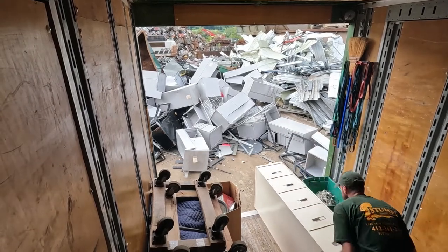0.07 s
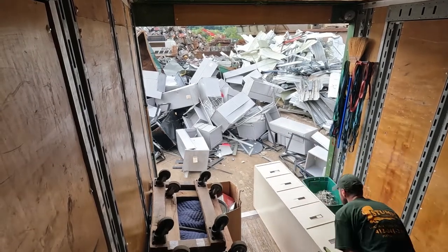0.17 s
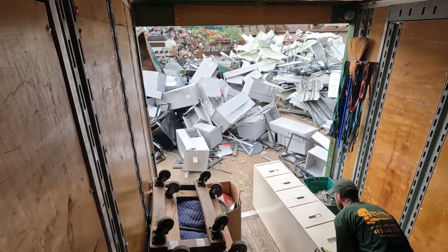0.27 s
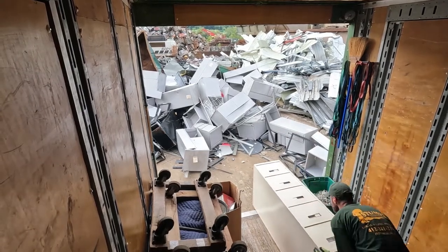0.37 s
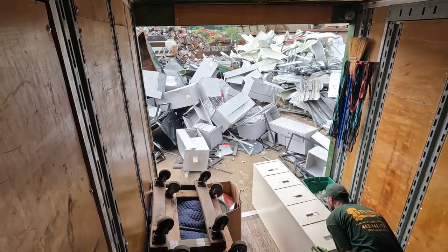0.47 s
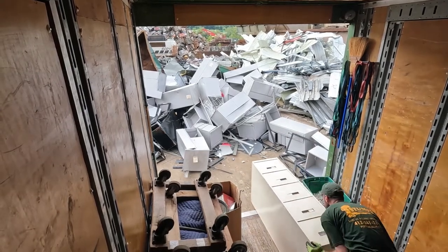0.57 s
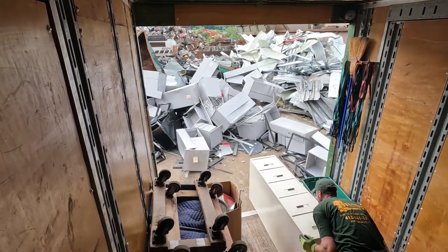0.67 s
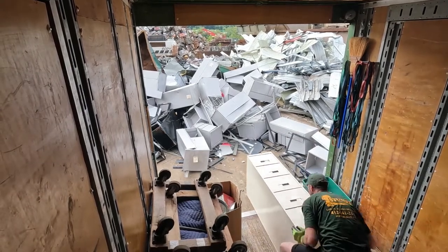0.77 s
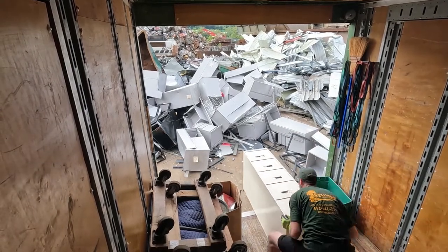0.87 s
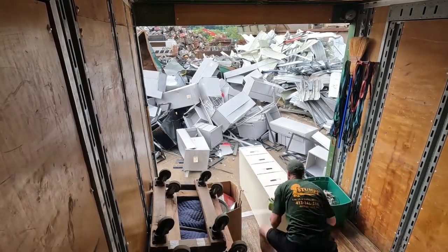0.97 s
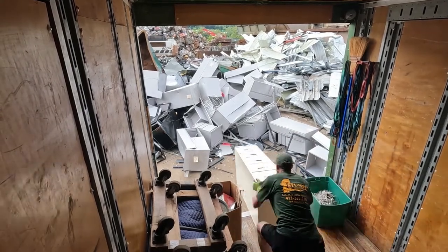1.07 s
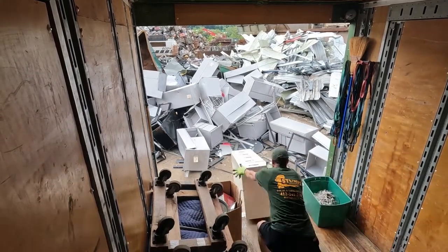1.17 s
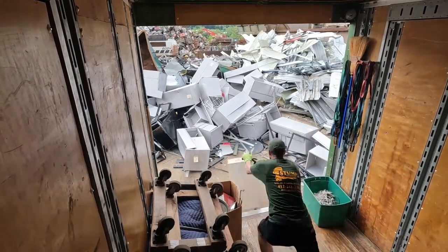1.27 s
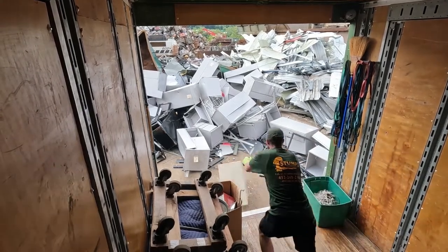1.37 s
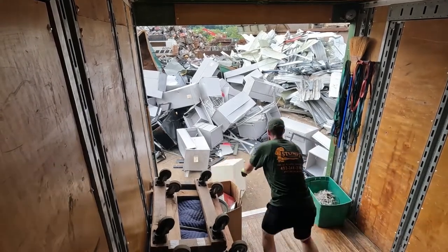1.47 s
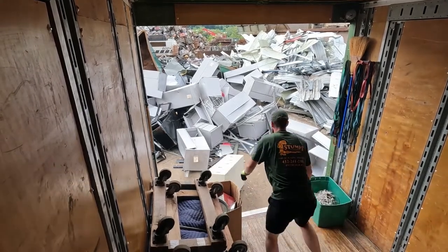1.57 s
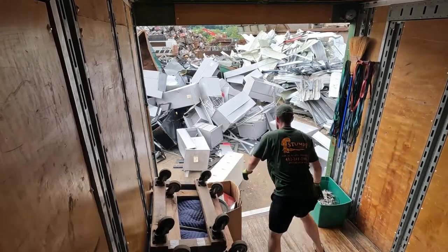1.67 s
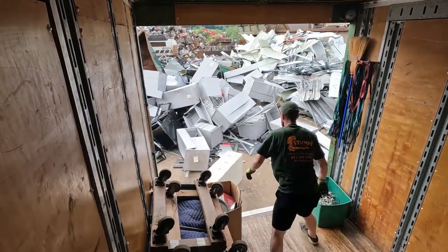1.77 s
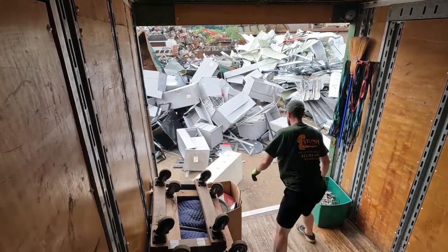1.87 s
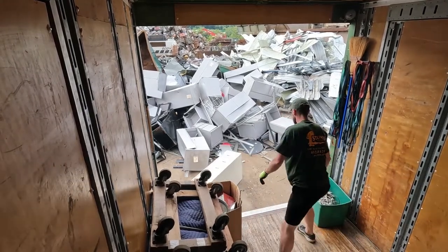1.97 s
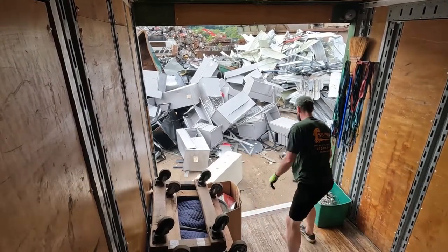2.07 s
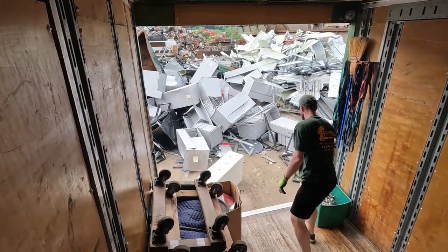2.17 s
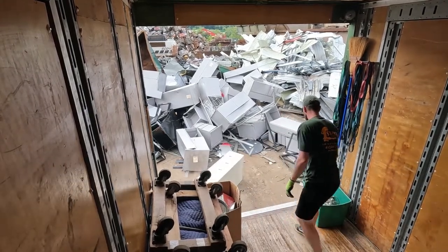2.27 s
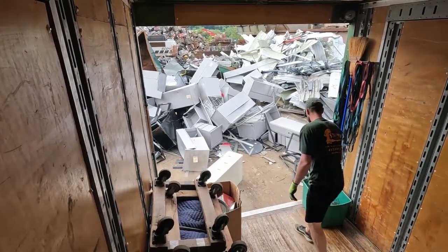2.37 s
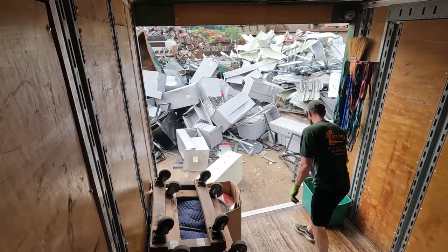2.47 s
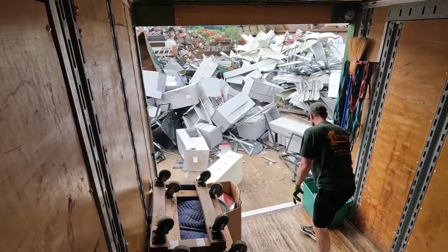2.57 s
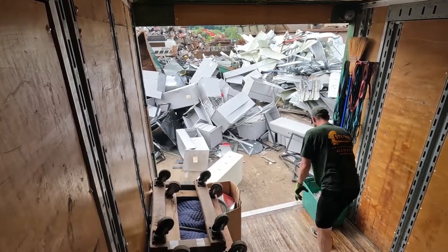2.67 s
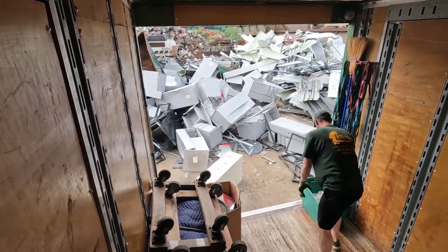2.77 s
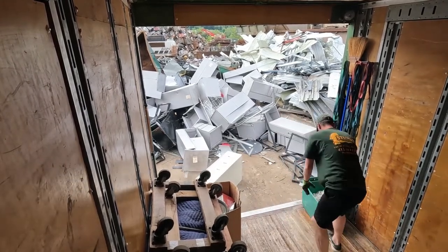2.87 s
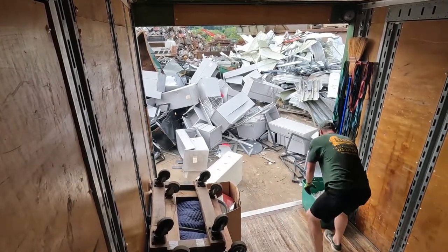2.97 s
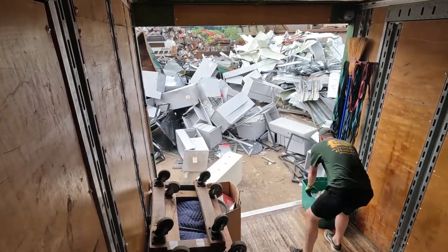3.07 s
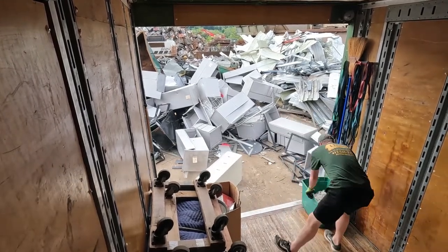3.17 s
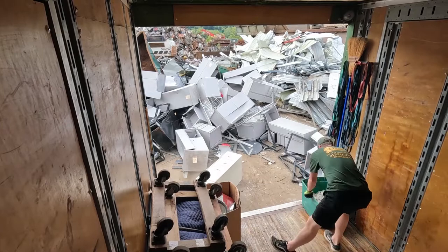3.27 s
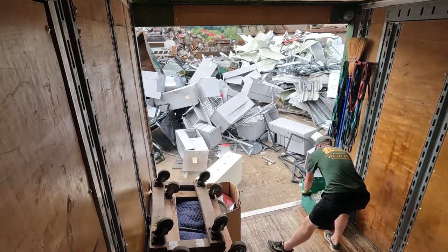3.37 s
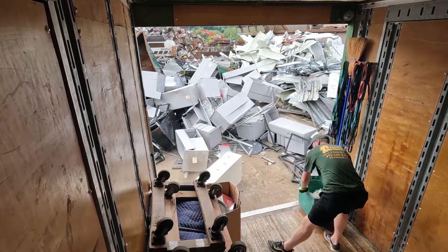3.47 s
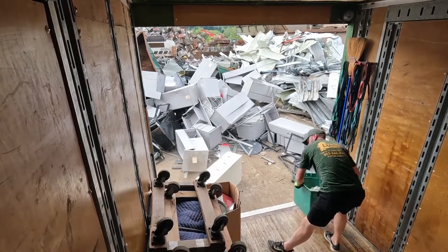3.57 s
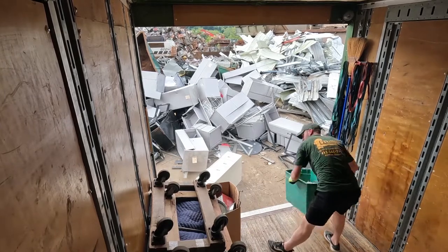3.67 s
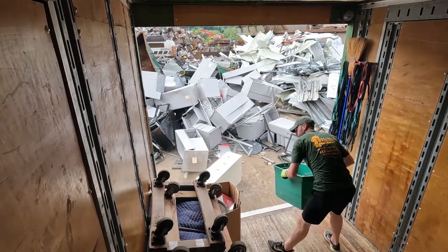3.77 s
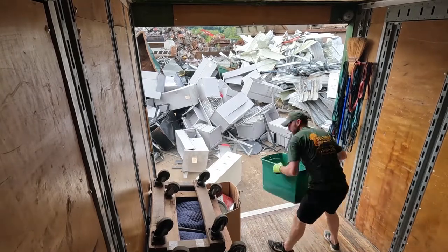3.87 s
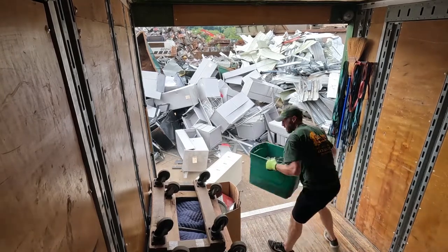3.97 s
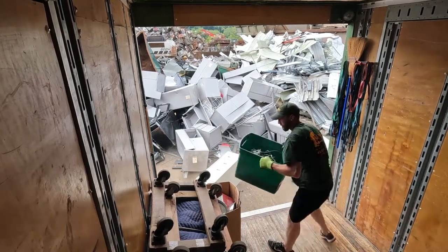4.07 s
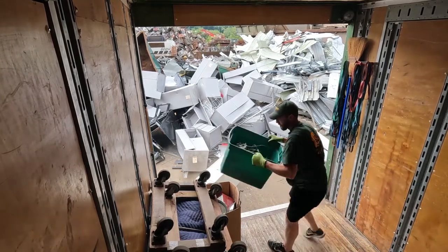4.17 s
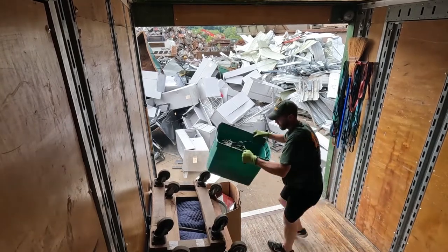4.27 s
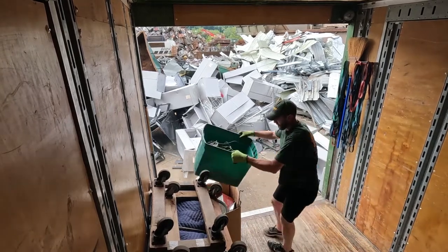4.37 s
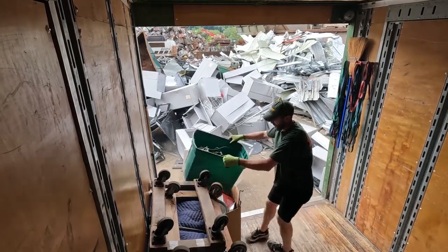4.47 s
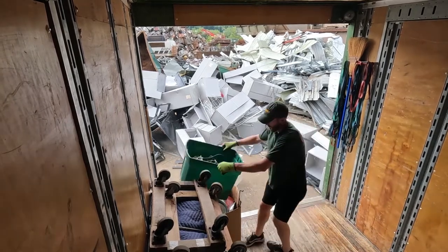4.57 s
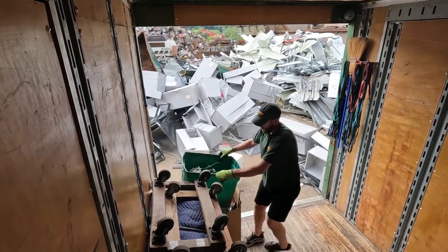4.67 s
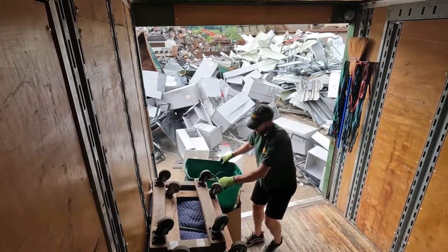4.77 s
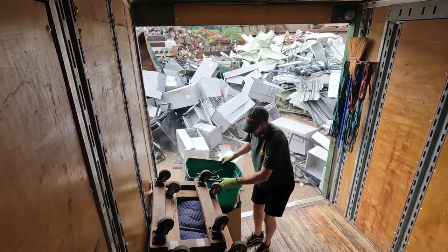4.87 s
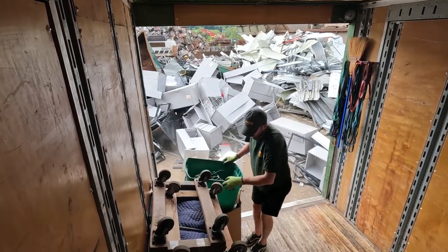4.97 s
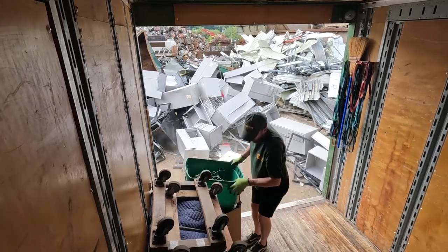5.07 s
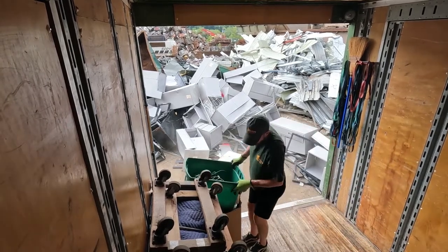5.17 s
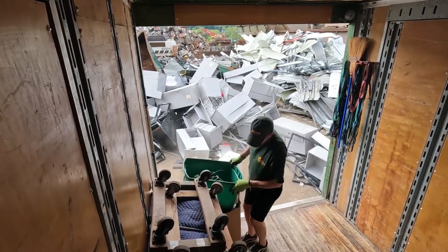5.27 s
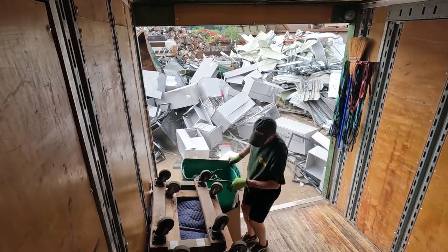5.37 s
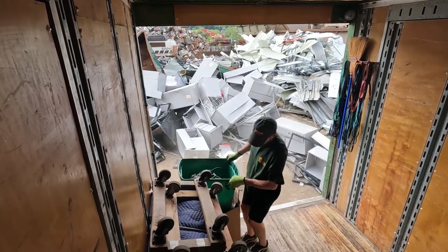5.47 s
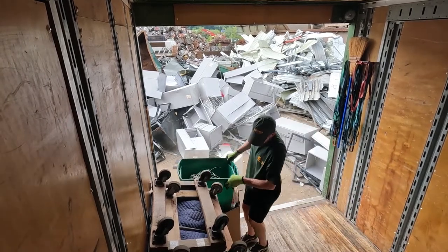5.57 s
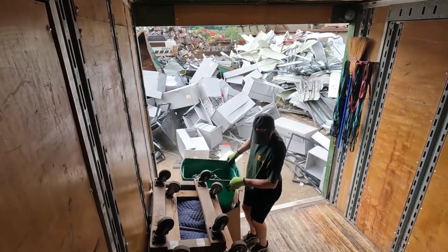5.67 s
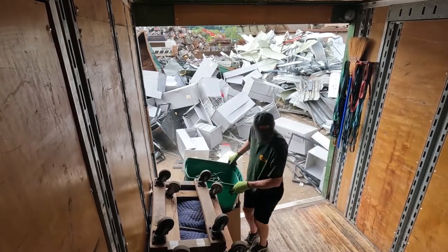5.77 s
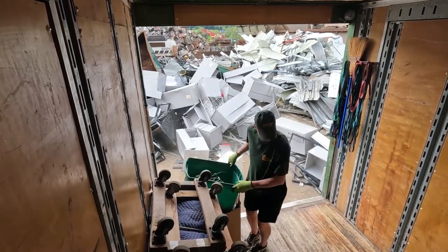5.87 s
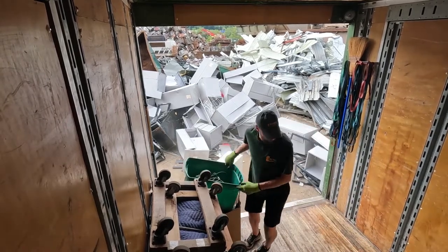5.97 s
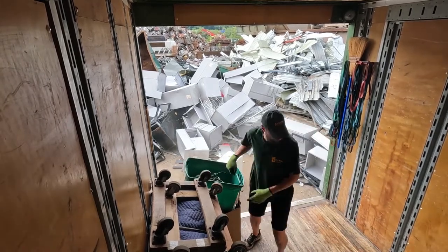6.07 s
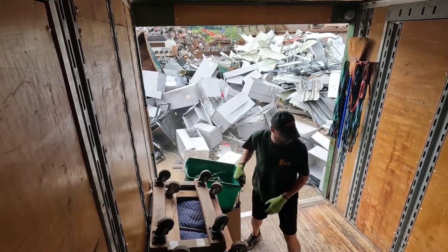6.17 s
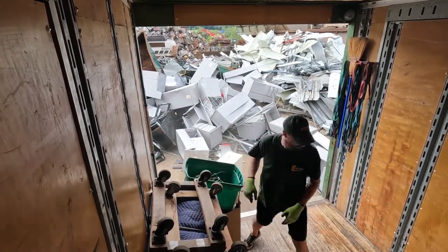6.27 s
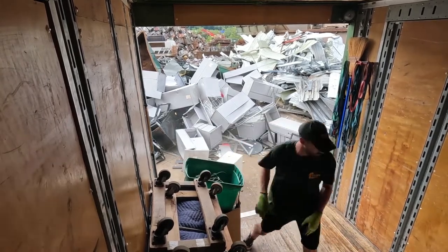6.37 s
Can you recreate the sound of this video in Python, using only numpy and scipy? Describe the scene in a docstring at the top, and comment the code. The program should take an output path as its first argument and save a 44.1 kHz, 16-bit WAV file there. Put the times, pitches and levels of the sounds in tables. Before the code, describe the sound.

From 0 s a heavy steel cabinet scrapes briefly over a wooden truck floor, its panels drumming, then eases to a low hum by 0.2 s. From about 0.6 s the push builds; around 1.05 to 1.3 s come short squeals, a rasping groan and the hardest scraping. At 1.48 s it crashes loudly, booming, with drawers rattling and small clanks; a second sharp, clanging crash hits at 1.83 s, and lesser rattles settle near 2.3 s. Dull boot thuds and gritty scuffs run from 2.5 to 3.7 s. Loose scrap rustles softly as a plastic bin is handled until about 5 s. It lands at 4.84 s with a bright clack, hollow boom and jumping scrap. Faint taps follow at 5.3 s, another firm knock at 5.85 s, then gentle rustling to the end. Distant machinery rumbles throughout under faint open-air hiss; the close stereo sound has a short boxy echo.

```python
"""A steel filing cabinet is shoved along the plywood floor of a truck box and crashes twice in a scrap yard.
Stick-slip contacts drive its panels and steel as it slides; blows ring its modes and rattle its drawers.
Boots thud and scuff on the boards; a plastic bin of loose scrap is lifted, rustling, and knocked down on a load,
its rim and hollow walls ringing as modes. Scattered taps give the box a short hollow echo, and filtered noise
makes distant machinery rumble in the yard."""
import sys
import numpy as np
from scipy import signal
from scipy.fft import rfft, irfft, next_fast_len
from scipy.io import wavfile

SR = 44100
rng = np.random.default_rng(int(sys.argv[2]) if len(sys.argv) > 2 else 0)


def output_pcm(signal):
    """Save a mono or channel-first signal as 16-bit PCM at the path in sys.argv[1].

    Samples are clipped to [-1, 1] before scaling.
    """
    pcm = np.clip(np.atleast_2d(signal).T, -1, 1) * 32767
    wavfile.write(sys.argv[1], SR, np.round(pcm).astype(np.int16))


N = 283959
T = np.arange(N) / SR  # seconds
HZ = np.fft.rfftfreq(16384, 1 / SR)  # frequency grid of the filters


def amp(db):
    """Level: decibels become a gain in amplitude."""
    return 10 ** (np.asarray(db) / 20)


def unit(x):
    """Normalisation: the signal is scaled to rms 1."""
    return x / np.sqrt(np.mean(x ** 2) + 1e-20)


def read(points, hz=HZ):
    """Spectral envelope: a table is interpolated on a log-frequency axis."""
    f, value = np.transpose(points)
    return np.interp(np.log(hz + 1), np.log(f + 1), value)


def shape(spectrum):
    """Spectral envelope: gain of a broad spectrum, with mean power 1."""
    return unit(amp(read(spectrum)))


def curves(rows):
    """Temporal envelope: each column of a table becomes a curve in time."""
    s, *columns = np.transpose(rows)
    return [np.interp(T, s, c) for c in columns]


def add(mix, s, sound):
    """Superposition: a sound is added to the mix at time s."""
    part = mix[max(round(s * SR), 0):][:len(sound)]
    part += sound[:len(part)]


def swell(out, s, seconds, db, sound):
    """Temporal envelope: a stretch of sound rises and falls as half a sine."""
    part = sound[:round(seconds * SR)]
    arch = np.sin(np.pi * np.arange(len(part)) / len(part))
    add(out, s, amp(db) * part * arch)


def colour(x, gain):
    """Minimum-phase filtering: a causal filter has the given gain at each frequency."""
    mirrored = np.r_[gain, gain[-2:0:-1]]
    log_gain = np.log(np.maximum(mirrored, 1e-5))
    # the Hilbert transform of the log gain gives the phase
    taps = np.fft.ifft(np.exp(np.conj(signal.hilbert(log_gain)))).real
    return signal.oaconvolve(x, taps[:len(gain)])[:len(x)]


def peaks(rows):
    """Resonance: the powers of a set of peaks add up; each width is where a peak halves in amplitude."""
    power = sum(amp(db) ** 2 / (1 + ((HZ - hz) / width) ** 2) ** 2 for hz, width, db in rows)
    return np.sqrt(power)


def decay(t, t60):
    """Exponential decay: the level falls 60 dB in t60 seconds."""
    return np.exp(-np.log(1000) * t / t60)


def wander(rate):
    """Random modulation: slow motion of rms 1 through `rate` random values per second."""
    knots = rng.standard_normal(4096)
    return unit(np.interp(T * rate, np.arange(len(knots)), knots))


def waver(hz, jitter, jitter_per_s):
    """Frequency modulation: a vibration's pitch wavers round the given one."""
    return np.sin(2 * np.pi * np.cumsum(hz * (1 + jitter * wander(jitter_per_s))) / SR)


def grains(per_s, spread_db):
    """Impulsive excitation: tiny contacts at random moments, a few larger than the rest."""
    size = amp(spread_db * np.minimum(rng.exponential(1, N), 4)) * rng.choice([-1, 1], N)
    return unit(size * (rng.random(N) < per_s / SR))


CRACK_S = 0.00084  # a blow with this attack gives the full crack; a slower attack gives less


def clatter(rows, body, per_s, spread_db, crack_db, treble_hz):
    """Impact noise: a shower of contacts builds up and dies; the quicker it builds, the louder it cracks."""
    out, t, shower = np.zeros(N), T[:SR], grains(per_s, spread_db)
    for s, db, treble_db, t60, attack_s in rows:
        contacts = np.roll(shower, -round(s * SR))[:SR]  # its own stretch of the shower
        force = contacts * decay(t, t60) * (1 - np.exp(-t / attack_s))
        force[:3] += amp(crack_db) * CRACK_S / attack_s * np.array([.5, 1, .5]) / 2
        dull = signal.lfilter(*signal.butter(1, treble_hz, fs=SR), force)
        add(out, s, amp(db) * (dull + amp(treble_db) * (force - dull)))
    return colour(out, body)


def ring(hz, t60, rise):
    """Modal radiation: one mode swells briefly and dies away; the air follows the surface's speed."""
    t = T[:SR]
    motion = np.sin(2 * np.pi * hz * t) * decay(t, t60) * (1 - np.exp(-t / rise))
    return np.gradient(motion) * SR / (2 * np.pi * hz)


def booms(rows, modes, rise, scatter_db):
    """Modal synthesis: each blow, at the level in its last column, rings a slightly varied mix of modes."""
    out = np.zeros(N)
    # neighbouring modes have opposite signs
    rings = np.array([(-1) ** k * amp(db) * ring(hz, t60, rise) for k, (hz, db, t60) in enumerate(modes)])
    for row, mix in zip(rows, rng.standard_normal((len(rows), len(modes)))):
        add(out, row[0], amp(row[-1] + scatter_db * mix) @ rings)
    return out


def with_contents(blows, strike_t60, lag_s, landing_attack_s):
    """Secondary impact: the shell strikes, then its loose contents land and rattle."""
    rows = []
    for s, strike_db, rattle_db, rattle_t60, treble_db, attack_s, *_ in blows:
        rows.append((s, strike_db, treble_db, strike_t60, attack_s))
        rows.append((s + lag_s, rattle_db, treble_db, rattle_t60, landing_attack_s))
    return rows


def follow(law, effort_db):
    """Power law: the gain of a voice grows with effort."""
    full_effort_db, slope = law
    return amp(full_effort_db + slope * effort_db)


# How hard the cabinet is pushed: one shove dies away, the next builds until it tips out.
# Each row: time in seconds, effort in dB.
PUSH = [(0, -6.5), (.17, -22.5), (.5, -32), (.62, -21), (.9, -14.5), (1.05, -13), (1.105, -2.5), (1.2, 0),
        (1.35, -10), (1.46, -22.5)]
# Laws of the sliding voices. Each: level at full effort in dB, dB gained per dB of effort.
DRUM_LAW = (-11, 0.92)
DRONE_LAW = (-16.5, 0.13)
SCRAPE_LAW = (-25, 1)
GRIT_LAW = (-38.5, 0.87)
# Panels drumming on the floor. Each row: frequency in Hz, half-width in Hz, relative level in dB.
PANEL_RESONANCES = [(59.5, 25, 4), (83, 20, -1.5), (121.7, 9.1, 4.5), (167, 44, -8), (224, 43, -11),
                    (260.2, 15, -9), (328, 66, -27.5)]
# Spectrum of scraping steel. Each row: frequency in Hz, relative level in dB.
SCRAPE_SPECTRUM = [(210, -31), (350, 5), (500, -1.5), (660, -3.5), (763, -5.5), (1150, -3), (2560, -16.5),
                   (3170, -15), (5000, -39), (6500, -67), (11000, -120)]
# Spectrum of crunching grit. Each row: frequency in Hz, relative level in dB.
GRIT_SPECTRUM = [(2350, -4), (4000, -4), (4370, -4), (7090, -7), (8450, -17), (12000, -19.5), (13700, -30)]
PANEL_RELEASE_DB_PER_S = 43  # the panels ring on when the push eases
DRONE_REST_HZ, DRONE_RISE_HZ = 91.1, 26.76  # the largest panel hums higher under load


def slide():
    """Stick-slip friction: panels drum and hum, steel scrapes, groans and squeals, grit crunches."""
    effort_db, = curves(PUSH)
    release = PANEL_RELEASE_DB_PER_S * T
    shake_db = np.maximum.accumulate(effort_db + release) - release
    judder = unit(amp(2.07 * wander(70.16)))
    on_floor = np.interp(T, [1.45, 1.49], [1, 0])
    # a thin panel radiates little below its lowest mode
    panels = peaks(PANEL_RESONANCES) * HZ ** 3 / (HZ ** 3 + 65 ** 3)
    drum = follow(DRUM_LAW, shake_db) * unit(colour(grains(900, 2.2) * judder, panels))
    drone_hz = DRONE_REST_HZ + DRONE_RISE_HZ * amp(shake_db)
    drone = follow(DRONE_LAW, shake_db) * waver(drone_hz, jitter=0.011, jitter_per_s=16.5)
    free = 1 - amp(effort_db - shake_db)  # the panel hums most as the push lets go
    scrape = follow(SCRAPE_LAW, effort_db) * colour(grains(3000, 3.0) * judder, shape(SCRAPE_SPECTRUM))
    grit = follow(GRIT_LAW, effort_db) * colour(grains(2500, 1.1) * judder, shape(GRIT_SPECTRUM))
    return on_floor * (drum + free * drone + scrape + grit + groan() + sliding_tones())


# Spectrum of the yard's noise. Each row: frequency in Hz, relative level in dB.
YARD_SPECTRUM = [(12, -2), (24, 2), (48, -7), (85, 0), (114, -7), (145, -7.5), (185, -9.5), (229, -10.5),
                 (400, -20.5), (500, -24), (1100, -24.5), (3400, -36.5), (7300, -46.5), (8800, -64),
                 (12300, -103), (14000, -107)]
# The drifting rumble. Each row: time in seconds, level in dB.
RUMBLE_DB = [(0, -47.5), (3.1, -30), (4.2, -35), (4.8, -31.5), (5.45, -45), (5.8, -36), (6.44, -35.5)]
# A distant engine: frequency in Hz, half-width in Hz, level in dB.
ENGINE_HUM = (142.4, 26.7, -38)
DEEP_DB, DEEP_HZ = -37.5, 53.6  # the deepest rumble stays steady
WASH_DB, WASH_DRIFT_DB = -49.5, 0.8  # hiss of the open yard: middle level, rms drift


def yard():
    """Filtered noise: a steady deep drone, a drifting rumble, a wavering hum and a nearly steady wash."""
    rumble_db, = curves(RUMBLE_DB)
    spectrum = amp(read(YARD_SPECTRUM))
    # power shares of the bands
    low = 1 / (1 + (HZ / 400) ** 4)
    lowest = 1 / (1 + (HZ / DEEP_HZ) ** 4)
    deep = unit(colour(rng.standard_normal(N), spectrum * np.sqrt(lowest)))
    rumble = unit(colour(rng.standard_normal(N), spectrum * np.sqrt(low * (1 - lowest))))
    wash = unit(colour(rng.standard_normal(N), spectrum * (1 - low)))
    hum = unit(colour(rng.standard_normal(N), peaks([ENGINE_HUM])))
    wash_gain = amp(WASH_DB + WASH_DRIFT_DB * wander(13))
    return amp(DEEP_DB) * deep + amp(rumble_db) * rumble + wash_gain * wash + amp(ENGINE_HUM[2]) * hum


# Short scuffs: grit crunching under the sliding cabinet, soles on the boards, scrap shifting.
# Each row: start in seconds, level in dB, treble in dB, t60 in seconds, attack in seconds.
SCUFFS = [(0, -42.5, 18, 0.13, 0.002), (.298, -53, 19, 0.072, 0.0046), (.868, -48.5, 7, 0.36, .005),
          (1.003, -28.5, -17, 0.25, 0.004), (1.088, -37, -5, 0.2, .006), (2.505, -46, 13.5, 0.15, 0.0031),
          (2.53, -35.5, -5, 0.44, 0.016), (2.703, -39, -2, 0.39, 0.002), (2.784, -40, 12, 0.2, 0.0015),
          (2.914, -51, 17, 0.26, 0.0019), (2.947, -41.5, -12, 0.39, 0.0035), (3.059, -42, -3, 0.48, 0.012),
          (3.285, -51, 5.5, 0.71, 0.0063), (3.365, -42.5, -10, 0.42, 0.012), (3.41, -37, -14, 0.38, 0.014),
          (4.65, -42.5, 14.5, 0.17, 0.0097), (4.73, -48.5, 11.5, 0.92, 0.0053),
          (4.827, -38, -10, 0.13, 0.006), (6.355, -50.5, 19, 0.25, .006)]
# Spectrum of a scuff. Each row: frequency in Hz, relative level in dB.
SCUFF_SPECTRUM = [(110, -9), (230, 7), (400, -1), (600, 3), (1050, 5.5), (2000, -5), (4000, -11),
                  (7000, -17), (8800, -27), (12000, -28), (15000, -51)]


def scuffs():
    """Frictional contact noise: grit crunches under the cabinet, soles scuff the boards and scrap shifts."""
    return clatter(SCUFFS, shape(SCUFF_SPECTRUM), per_s=1600, spread_db=2.0, crack_db=18, treble_hz=3520)


# Short tones of the sliding steel: squeals of the edge and the groan's clearer tones.
# Each row: start in seconds, length in seconds, middle pitch in Hz, glide in Hz per second, level in dB.
SLIDING_TONES = [(0.914, 0.11, 976, 250, -35), (0.998, 0.09, 996, -400, -38),
                 (1.054, 0.071, 958, -500, -23), (1.095, 0.11, 680, 0, -38), (1.18, 0.042, 945, -500, -27),
                 (1.183, 0.039, 1170, 200, -28), (1.183, 0.026, 1416, 0, -37), (1.29, 0.11, 978, -350, -40)]
TONE_ARCH = 0.047  # share by which the arch lowers the pitch at the ends of a tone


def sliding_tones():
    """Stick-slip oscillation: the sliding steel sounds short wavering tones that arch, and often glide, in pitch."""
    out = np.zeros(N)
    for s, seconds, hz, glide, db in SLIDING_TONES:
        t = np.minimum(T, seconds) - seconds / 2
        pitch = hz * (1 - TONE_ARCH * (2 * t / seconds) ** 2) + glide * t
        swell(out, s, seconds, db, waver(pitch, jitter=0.006, jitter_per_s=150))
    return out * unit(amp(1.0 * wander(89.5)))


# Under the hardest push the base rasps: start in seconds, length in seconds, level in dB.
GROAN = (1.143, 0.115, -22)
# Tones of the base at mid-groan. Each row: frequency in Hz, half-width in Hz, relative level in dB.
GROAN_TONES = [(1180, 80, 6), (1340, 110, 2), (1380, 75, 2), (1510, 89, -6), (1700, 140, -7)]
GROAN_SLIPS_PER_S = 77  # mean rate of the uneven slips, at mid-groan
GROAN_RISE_PER_S = 0.46  # the rasp climbs by this share of its mid-groan pitch each second


def groan():
    """Relaxation oscillation: quick slips ring the base, whose tones climb as the load on it grows."""
    out = np.zeros(N)
    slip_count = np.cumsum(GROAN_SLIPS_PER_S * (1 + 0.24 * wander(60))) / SR
    slips = np.exp(-2 * (slip_count % 1))
    rasp = unit(colour(grains(3000, 0.3) * slips, peaks(GROAN_TONES)))
    speed = 1 + GROAN_RISE_PER_S * (T[:SR] - GROAN[1] / 2)
    swell(out, *GROAN, np.interp(np.cumsum(speed), np.arange(N), rasp))
    return out


# Cabinet blows. Each row: start in seconds, strike in dB, rattle in dB, rattle t60 in seconds, treble in dB,
# attack in seconds, clang in dB, boom in dB, floor thud in dB.
CRASHES = [(1.477, -9.5, -21.5, 1.28, 3, 0.0046, -27, -15.5, -37),
           (1.59, -26.5, -31, 0.46, -3, .003, -40, -29, -38),
           (1.641, -24.5, -29.5, 0.65, 3, 0.0024, -49, -17.5, -35.5),
           (1.826, -13, -21, 0.55, 4.5, 0.0012, -12.5, -19.5, -12),
           (1.93, -22.5, -30.5, 0.77, -29, 0.0024, -39, -30, -44),
           (2.257, -28, -41, 0.33, 5, 0.0063, -54, -34, -39),
           (2.279, -42, -38.5, 0.52, -9, 0.0053, -27, -25.5, -36),
           (2.314, -43, -56, 0.27, 6, 0.0018, -52, -34, -40)]
# Spectrum of the rattling cabinet. Each row: frequency in Hz, relative level in dB.
CLATTER_SPECTRUM = [(76, -14), (130, -2), (220, -1), (257, -9), (325, -5), (435, -10.5), (471, -13),
                    (723, -13), (845, -11), (1180, -13.5), (1640, -20.5), (6420, -30.5), (8600, -38.5),
                    (11700, -40), (13700, -51.5)]
# Stiff frame of the cabinet. Each row: frequency in Hz, mean level in dB, t60 in seconds.
FRAME_MODES = [(620, -13, 0.046), (941, 1, 0.09), (1028, -2, 0.039)]
# Modes of the cabinet. Each row: frequency in Hz, mean level in dB, t60 in seconds.
CABINET_MODES = [(61.4, -1.5, 0.19), (86.5, -2, 0.93), (117.5, 1.5, 0.91), (167, -9, 1), (220.6, -5.5, 1),
                 (255, -11, 0.84), (286.7, -7.5, 0.84), (338, -9.5, 0.76), (469, -25, 0.87),
                 (700, -21, 0.059), (938, -7, 0.17), (1122, -22, 0.47), (1340, -16.5, 0.24),
                 (1500, -21, 0.21), (1770, -31, 0.35), (2500, -43, 0.15), (3060, -33.5, 0.77),
                 (3660, -27, 0.22), (5000, -30, 0.24), (5640, -25, 0.2)]
# Thin sheets shaken by the rattle. Each row: frequency in Hz, half-width in Hz, relative level in dB.
SHEETS = [(820, 36, -4), (932, 28, 2), (1013, 71, -5), (1210, 41, -6.5), (1310, 45, -11), (1920, 140, -11),
          (2600, 23, -20), (4300, 60, -22), (4730, 30, -17), (5800, 32, -23)]
SHEET_DB = 6.5  # added to every sheet
# the blow is over quickly; the drawers land a moment later and rattle on
CABINET_STRIKE_T60, DRAWER_LAG_S, DRAWER_ATTACK_S = 0.12, 0.024, 0.0088
RATTLE_FLUTTER_DB = 1.0  # rms


def crash():
    """Modal impact: the cabinet lands end first, topples and settles; frame clangs, drawers rattle, sheets ring."""
    times, *_, clang_db, boom_db, _ = np.transpose(CRASHES)
    contacts = with_contents(CRASHES, CABINET_STRIKE_T60, DRAWER_LAG_S, DRAWER_ATTACK_S)
    body = shape(CLATTER_SPECTRUM)
    rattle = clatter(contacts, body, per_s=3500, spread_db=0.5, crack_db=11, treble_hz=2470)
    clang = booms(list(zip(times, clang_db)), FRAME_MODES, rise=0.00042, scatter_db=3.5)
    boom = booms(list(zip(times, boom_db)), CABINET_MODES, rise=0.00085, scatter_db=2.5)
    rattle = rattle * unit(amp(RATTLE_FLUTTER_DB * wander(320)))
    # dividing by the body's gain leaves the sheets their own spectrum
    sheets = colour(rattle, amp(SHEET_DB) * peaks(SHEETS) / body)
    return rattle + sheets + tinkles(rattle) + clang + boom


# small loose parts: ticks per second in all, level against the rattle, t60 in seconds
TINKLES_PER_S, TINKLE_DB, TINKLE_T60 = 800, -11, 0.013
TINKLE_LOW_HZ, TINKLE_HIGH_HZ = 1287, 7030  # range before each pitch is scattered


def tinkles(rattle, count=32):
    """Driven resonance: clips, handles and runners tick at their own pitches as hard as the rattle shakes them."""
    power = signal.lfilter([1 / 300], [1, 1 / 300 - 1], rattle ** 2)
    shake = np.sqrt(abs(power))
    pitches = np.geomspace(TINKLE_LOW_HZ, TINKLE_HIGH_HZ, count) * rng.uniform(0.95, 1.04, count)
    ticks = np.zeros(N)
    for hz in pitches:
        part = ring(hz, TINKLE_T60, 0.0001)[:SR // 10]
        ticks += signal.oaconvolve(grains(TINKLES_PER_S / count, 1.5), part)[:N] / hz ** 0.54
    return amp(TINKLE_DB) * shake * unit(ticks)


# Boots thud on the boards. Each row: start in seconds, level in dB.
STEPS = [(2.527, -13), (2.75, -19), (2.949, -15.5), (3.122, -14), (3.325, -22), (3.466, -16.5),
         (3.635, -18.5)]
# Floor modes. Each row: frequency in Hz, relative level in dB, t60 in seconds.
BOARD_MODES = [(59, -17, 0.05), (72, 1.5, 0.15), (94.8, -4, 0.26), (176, -5.5, 0.054)]


def floorboards():
    """Plate modes: heels and heavy loads thud on the same boards."""
    thuds = booms(STEPS + CRASHES + KNOCKS, BOARD_MODES, rise=0.0019, scatter_db=0.0)
    return signal.lfilter(*signal.butter(2, 45, "high", fs=SR), thuds)


# Clanks of drawers, runners and scrap, with a few low thumps of the cabinet body.
# Each row: start in seconds, centre frequency in Hz, level in dB, t60 in seconds.
CLANKS = [(1.484, 3110, -25, 0.083), (1.503, 1003, -20, 0.19), (1.529, 790, -21, 0.11),
          (1.551, 2220, -31, 0.11), (1.617, 1404, -27, 0.08), (1.585, 1920, -33, 0.15),
          (1.644, 1270, -36, 0.1), (1.647, 6200, -42, 0.25), (1.492, 288, -17, .07),
          (1.708, 291, -23.5, 0.081), (1.736, 2600, -35, 0.18), (1.769, 1074, -34, 0.088),
          (1.83, 5250, -24.5, 0.11), (1.848, 2800, -38, 0.063), (1.867, 1320, -25, 0.091),
          (1.896, 1120, -29, 0.15), (1.93, 1507, -33, 0.088), (1.973, 2380, -33, 0.068),
          (2.03, 539, -32, .1), (2.266, 6430, -41.5, 0.066), (2.281, 1043, -33, 0.06),
          (2.316, 4560, -51, 0.096), (2.703, 6650, -49, 0.1), (2.707, 960, -38, 0.12),
          (2.916, 7300, -47, 0.071), (4.839, 5050, -25, 0.056), (4.86, 3600, -39, 0.062),
          (4.91, 2570, -41, .1), (4.985, 1156, -37, 0.21), (5.278, 1152, -39, 0.084),
          (5.854, 2120, -34, .07), (5.856, 3620, -43, 0.051), (5.893, 1906, -33, 0.079)]
CLANK_SPREAD_OCT, CLANK_RISE_S = .25, 0.00046  # spread either side of the centre


def clanks(count=28):
    """Inharmonic partials: each struck part rings a cluster of unrelated tones round its own pitch."""
    out, t = np.zeros(N), T[:SR // 2]
    for s, hz, db, t60 in CLANKS:
        place, phase = rng.random((2, count, 1))
        octaves = CLANK_SPREAD_OCT * (2 * (np.arange(count)[:, None] + place) / count - 1)
        partials = unit(np.sin(2 * np.pi * (hz * 2 ** octaves * t + phase)).sum(0))
        envelope = decay(t, t60) * (1 - np.exp(-t / CLANK_RISE_S))
        add(out, s, amp(db) * partials * envelope)
    return out


# Loose metal sings thinly.
# Each row: start in seconds, length in seconds, frequency in Hz, half-width in Hz, level in dB.
ZINGS = [(2.077, 0.095, 7300, 700, -52.5), (2.08, 0.11, 11070, 1400, -64), (5.19, 0.11, 7200, 80, -73)]


def zings():
    """Narrow-band resonance: metal edges rub briefly and sing."""
    out = np.zeros(N)
    for s, seconds, hz, width, db in ZINGS:
        rub = unit(colour(rng.standard_normal(SR), peaks([(hz, width, 0)])))
        rub = rub[-round(seconds * SR):]  # past the filter's build-up
        add(out, s, amp(db) * rub * signal.windows.tukey(len(rub), .2))
    return out


# Loose scrap and clothes rustle as the bin is handled.
# Each row: start in seconds, length in seconds, level in dB.
RUSTLES = [(3.353, 0.92, -47), (4.101, 1.0, -45.5), (5.553, 0.72, -47.5), (6.021, 0.91, -43)]
# Spectrum of a rustle. Each row: frequency in Hz, relative level in dB.
RUSTLE_SPECTRUM = [(250, 4), (500, -1.5), (1100, -4.5), (3400, -11.5), (7300, -23), (8800, -35),
                   (13000, -57)]


def rustles():
    """Granular noise: each move of the bin is a soft swell of tiny contacts."""
    out = np.zeros(N)
    for s, seconds, db in RUSTLES:
        swell(out, s, seconds, db, colour(grains(3000, 3.3), shape(RUSTLE_SPECTRUM)))
    return out


# Bin knocks. Each row: start in seconds, strike in dB, rattle in dB, rattle t60 in seconds, treble in dB,
# attack in seconds, share of the free ring time, rim in dB, hollow note in Hz, boom in dB, floor thud in dB.
KNOCKS = [(4.8397, -23.5, -27, 0.55, 9, 0.0017, 1, -11, 210, -3.5, -42),
          (4.8578, -44, -37, 0.33, 10, .003, 0.92, -42, 230, -8, -28),
          (4.884, -49, -30, 0.23, 7, .002, 1, -41, 122, -5.5, -11.5),
          (5.2766, -41, -56, 0.12, -15, .002, 0.49, -40, 194, -8, -46),
          (5.293, -58, -66, 0.086, -16, .003, 0.58, -52, 233, -13, -48),
          (5.311, -62, -68, 0.08, -14, .003, .45, -49, 217, -17.5, -50),
          (5.335, -62, -68, 0.08, -14, .003, 0.27, -56, 275, -24, -50),
          (5.854, -26, -36.5, 0.39, 2.5, 0.00079, 0.77, -27.5, 306, -11.5, -16.5),
          (5.869, -37, -53, 0.18, -10, .002, 0.94, -42, 136, -12, -22),
          (5.888, -49, -40.5, 0.22, -18, .002, 0.63, -39, 263, -16, -31)]
# Stiff rim of the bin. Each row: frequency in Hz, relative level in dB, t60 in seconds.
RIM_MODES = [(545, -15, 0.065), (790, -9.5, 0.043), (979, -1.5, 0.04), (1170, -32, 0.13), (1404, -8, 0.031),
             (1990, -11, 0.032), (2870, -7.5, 0.017), (3900, -14, 0.02), (6300, -14, 0.038)]
# Spectrum of the jumping scrap. Each row: frequency in Hz, relative level in dB.
SCRAP_SPECTRUM = [(190, -25), (330, 3), (520, -3.5), (750, -9), (1000, -7), (1350, -10.5), (1800, -12),
                  (2400, -17.5), (3400, -17), (6200, -27), (7200, -27), (8300, -36), (12000, -42),
                  (14500, -60)]
# Hollow bin. Each row: frequency in Hz, relative level in dB before focusing, t60 in seconds when free.
BIN_MODES = [(93.4, -3, 0.27), (124.3, -6, 0.34), (151, -3.5, 0.16), (205.5, 3, 0.092), (249.6, -3, 0.15),
             (279.6, -10, 0.27), (314.6, -18, 0.21), (460, -18, 0.26)]
# the rim clacks first, the walls boom just after, then the scrap inside lands
BIN_STRIKE_T60, SCRAP_LAG_S, SCRAP_ATTACK_S, BIN_BOOM_LAG_S = 0.12, 0.02, 0.0016, 0.00309
BIN_FOCUS_DB_PER_OCT = 12  # the spot that is struck favours the modes near its own note
BIN_RISE_S = 0.0015


def plastic_bin():
    """Damped modes: the rim clacks, the hollow bin booms and the scrap inside it jumps."""
    times, *_, rim_db, _, _, _ = np.transpose(KNOCKS)
    rim = booms(list(zip(times, rim_db)), RIM_MODES, rise=0.00024, scatter_db=-0.5)
    contacts = with_contents(KNOCKS, BIN_STRIKE_T60, SCRAP_LAG_S, SCRAP_ATTACK_S)
    rattle = clatter(contacts, shape(SCRAP_SPECTRUM), per_s=1400, spread_db=1.1, crack_db=15.5, treble_hz=4100)
    boom = np.zeros(N)
    for s, *_, ring_share, _, note_hz, boom_db, _ in KNOCKS:
        modes = []
        for hz, db, t60 in BIN_MODES:
            focus_db = -BIN_FOCUS_DB_PER_OCT * abs(np.log2(hz / note_hz))
            modes.append((hz, db + focus_db, ring_share * t60))
        boom += booms([(s + BIN_BOOM_LAG_S, boom_db)], modes, rise=BIN_RISE_S, scatter_db=1.0)
    return rim + rattle + boom


# Decay in the truck box. Each row: frequency in Hz, t60 in seconds.
BOX_T60 = [(100, 0.76), (300, 0.13), (1000, 0.18), (4000, 0.2034), (12000, 0.13)]


def tail():
    """Reverberation: reflections between the plywood walls, each band dying at its own speed."""
    taps = rng.choice([-1., 1.], SR) * (rng.random(SR) < 4000 / SR) * (T[:SR] > .004)
    hz, t, z = signal.stft(taps, SR, nperseg=256)
    z = z * decay(t, read(BOX_T60, hz)[:, None])
    echoes = signal.istft(z, SR, nperseg=256)[1]
    return echoes / np.linalg.norm(echoes)


# Colour of the echo. Each row: frequency in Hz, relative level in dB.
BOX_WET = [(100, -16), (250, -7.5), (600, 0), (3000, -3), (12000, -6)]


def box(x, count=3):
    """Reverberation: the sound is shared in rotation among a few echo tails, which avoids one fixed ripple."""
    shares = np.cos(np.pi * (T * 23 + np.arange(count)[:, None] / count)) ** 8
    shares = shares / np.linalg.norm(shares, axis=0)
    echoes = sum(signal.oaconvolve(x * share, tail())[:N] for share in shares)
    return colour(echoes, amp(read(BOX_WET)))


# Spread to the sides. Each row: frequency in Hz, side gain in dB.
WIDTH = [(40, -34), (90, -35), (180, -22), (350, -14.5), (700, -12), (1400, -8.5), (2800, -6), (5600, -6.5),
         (11000, 0)]
# Balance of the channels. Each row: frequency in Hz, left minus right in dB.
LEAN = [(90, 0), (350, .6), (1200, 1.8), (5000, 1.2), (10000, 3.2)]


def scene():
    """Mid-side stereo: direct sound is in the middle, echoes and yard spread, and the whole leans by frequency."""
    near = slide() + crash() + plastic_bin() + floorboards() + scuffs() + rustles() + zings() + clanks()
    mid = near + box(near) + yard()
    side = colour(amp(3.5) * box(near) + yard(), amp(read(WIDTH)))
    size = 2 * next_fast_len(N // 2 + 4096)
    lean = amp(read(LEAN, np.fft.rfftfreq(size, 1 / SR)) / 2)
    return irfft(rfft([mid + side, mid - side], size) * [lean, 1 / lean])[:, :N]


EDGE_HZ = 15400  # band limit


def record(dry):
    """Saturation and band limiting: the loudest peaks are rounded off, then the top is filtered away."""
    rounded = dry / (1 + dry ** 6) ** (1 / 6)
    low_pass = signal.firwin(255, EDGE_HZ, window=("kaiser", 9), fs=SR)
    return signal.oaconvolve(rounded, low_pass[None], "same")


dry = scene()
out = record(dry)
output_pcm(out)
```